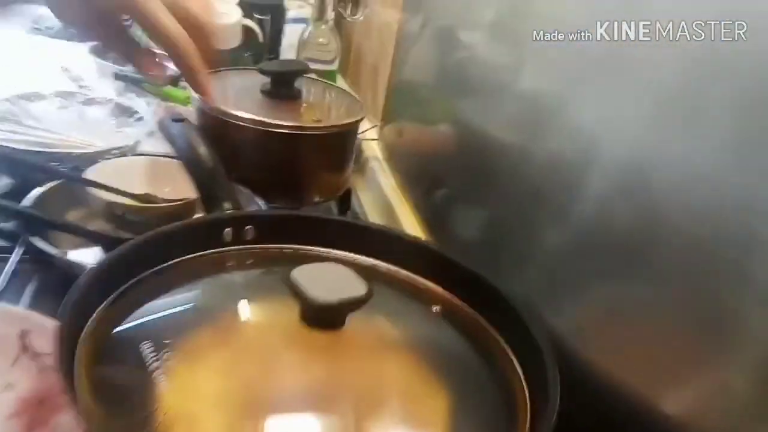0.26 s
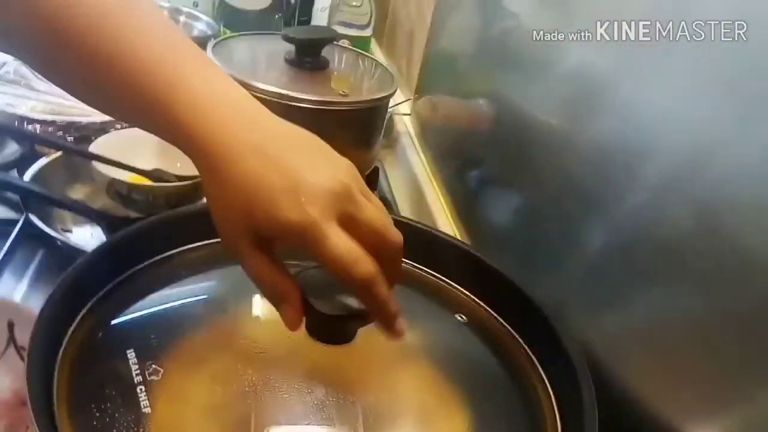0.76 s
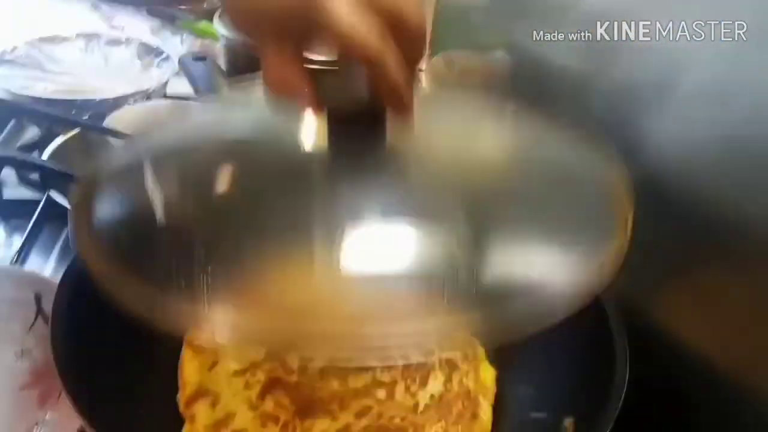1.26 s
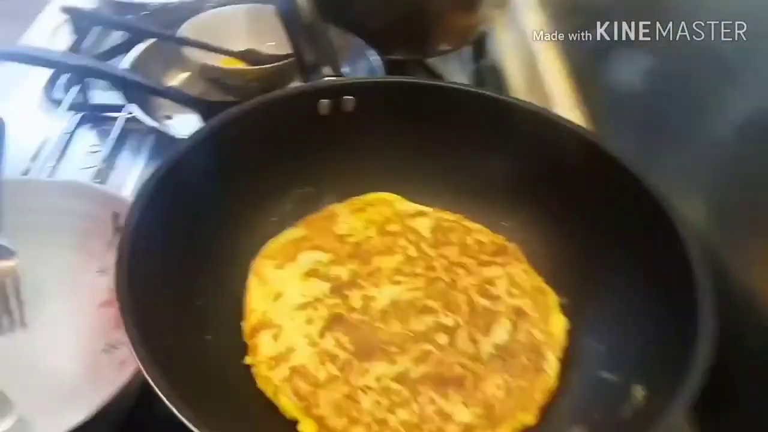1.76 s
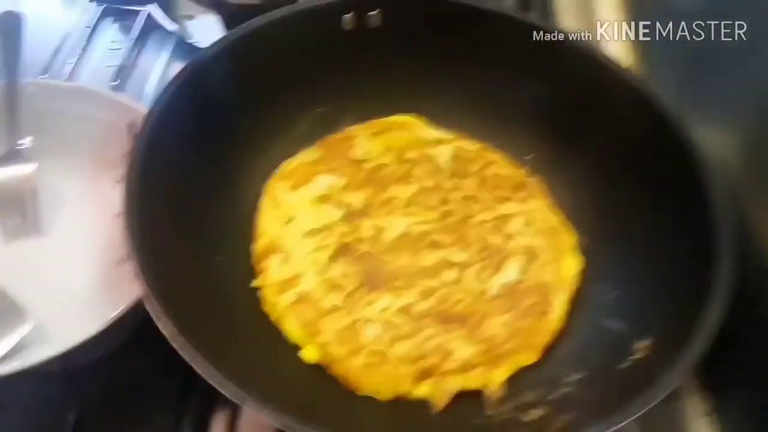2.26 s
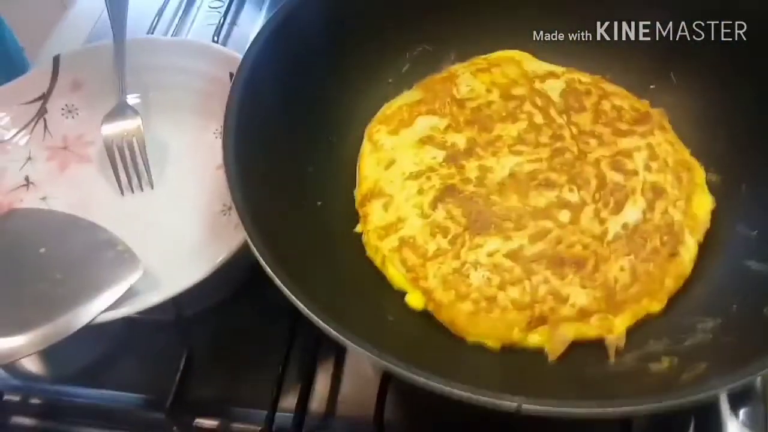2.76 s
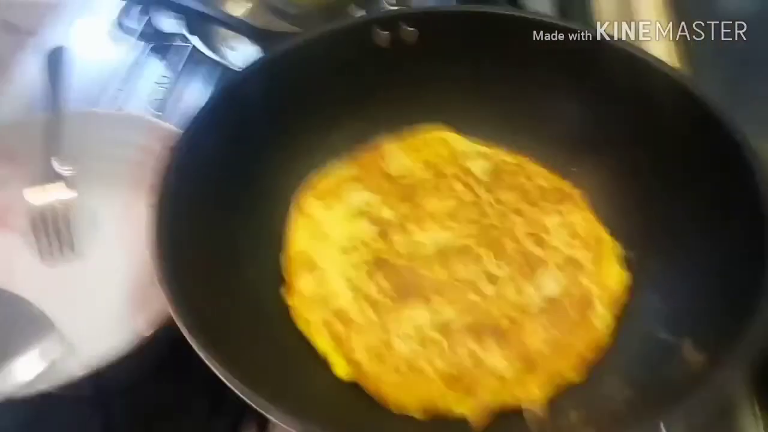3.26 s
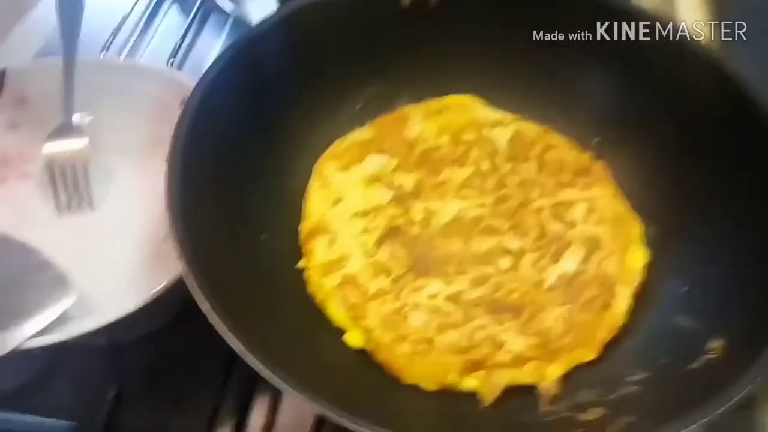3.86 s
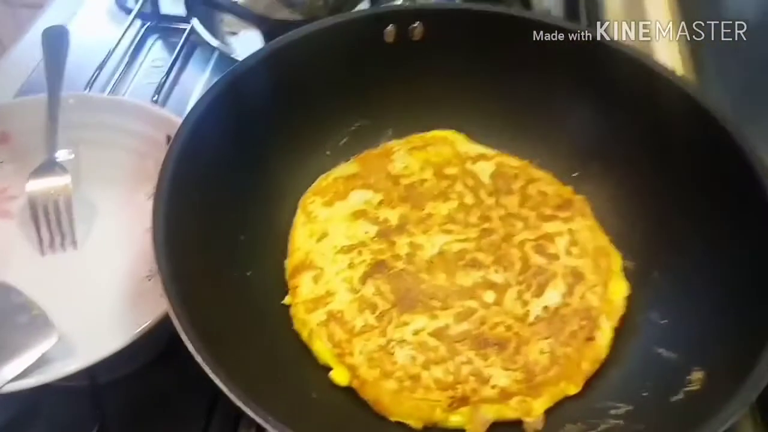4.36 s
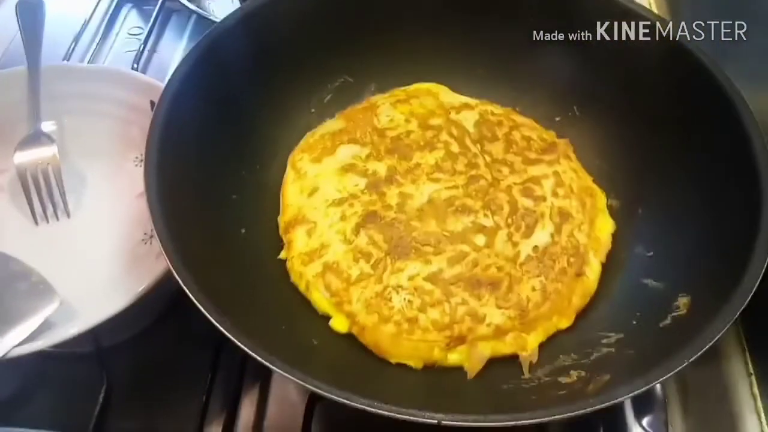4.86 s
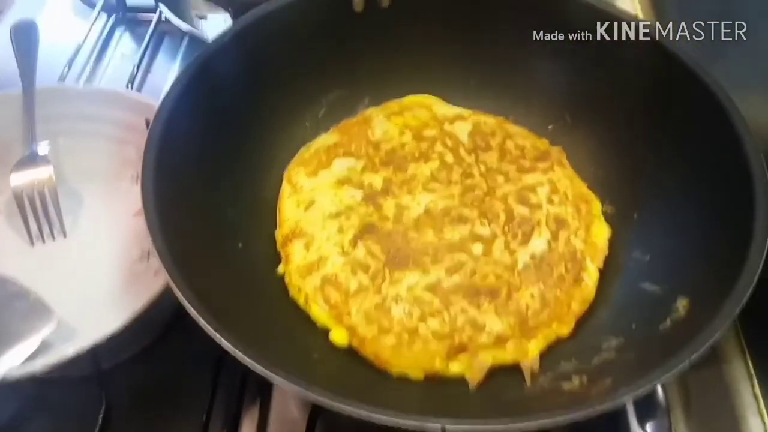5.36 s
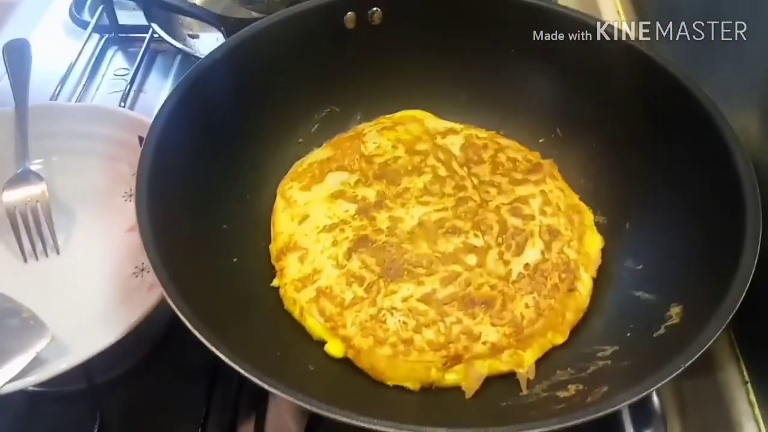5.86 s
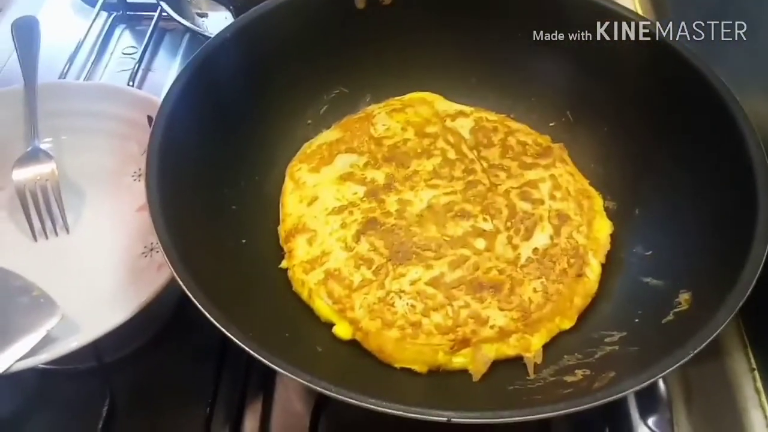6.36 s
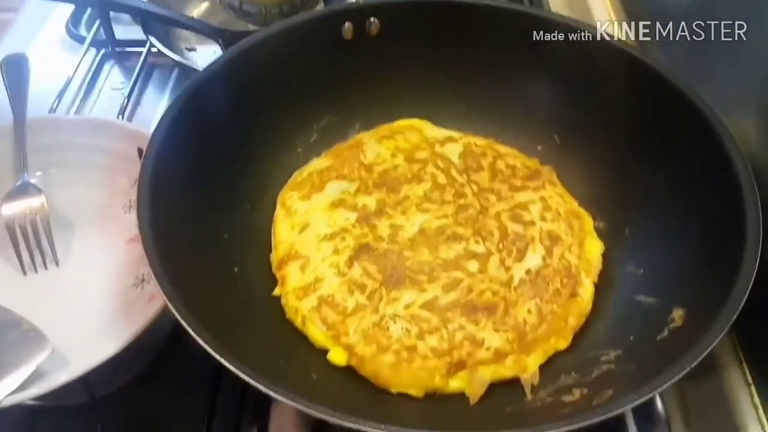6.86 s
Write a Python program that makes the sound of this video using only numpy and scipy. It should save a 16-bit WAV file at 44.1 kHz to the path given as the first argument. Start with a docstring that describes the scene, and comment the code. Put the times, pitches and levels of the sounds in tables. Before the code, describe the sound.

A running cooker hood fills a small home kitchen with rushing air, a fluttering low boom and a thin motor hum. Fingers tick and brush on the handheld stereo device, mostly to the right. At about one second a glass lid clunks, rattles and scrapes briefly off the pan. The muffled frying then opens into soft fizz with small bubbles and occasional sharp spits, thickening into crackles at the very end.

```python
"""Omelette under a cooker hood

A running hood roars like rushing air (shaped noise), booms in its duct (noise through resonances)
and hums near multiples of the mains (sines). A hand lifts the glass lid, which knocks and scrapes
(ringing modes); then fat fizzes, bubbles and spits openly (tiny bursts, short rings and cracks).
Fingers tick and brush on the phone, whose two far-apart microphone ports colour the treble differently."""
import sys
import numpy as np
from scipy import signal
from scipy.fft import rfft, irfft, next_fast_len
from scipy.io import wavfile
from scipy.ndimage import uniform_filter1d, map_coordinates

SR = 44100
rng = np.random.default_rng(int(sys.argv[2]) if len(sys.argv) > 2 else 0)


def put_to_file(sound):
    """Save the sound as 16-bit audio at rate SR, in the file named by the first command-line argument."""
    columns = np.atleast_2d(sound).T  # one column per channel
    safe = np.clip(columns, -1, 1)
    whole_steps = np.round(safe * 32767)
    wavfile.write(sys.argv[1], SR, whole_steps.astype(np.int16))


N = 313683  # length [samples]

# Levels in the tables are those of each source, before the room and the ports colour them.
# Rushing air of the hood:
# (frequency [Hz], left level per Hz [dB], right level per Hz [dB], likeness of the two sides [0-1])
AIR_SPECTRUM = [(30, -66, -69, 0.8), (53.4, -70, -73, 0.95), (67.4, -64, -64, 1), (109, -58, -61.5, 0.96),
                (180, -67, -66.5, 1), (270, -74.5, -77.5, 0.57), (314, -72.5, -83.5, 1),
                (585, -79, -81, 0.93), (650, -78, -73.5, 0.19), (1010, -84.5, -82.5, 0.53),
                (1370, -83, -84, 0.56), (2450, -90.5, -89.5, 0.12), (4330, -100, -104.5, 0),
                (8900, -112, -112, 0.3)]
# Weaker air resonances of the duct: (frequency [Hz], width [Hz], left level [dB], right level [dB])
DUCT_RESONANCES = [(213.8, 30, -48, -49.5), (397, 73, -53, -60), (628.3, 51, -59.5, -63.5),
                   (837, 154, -63.5, -52)]
# Louder throbs of the strongest duct resonance: (time [s], peak level [dB], half length [s])
BOOM_THROBS = [(.04, -37.5, 0.028), (.12, -31, 0.024), (.31, -41, 0.011), (.42, -33, 0.012),
               (.5, -38, 0.016), (.6, -33.5, 0.013), (.72, -27, 0.028), (.85, -31.5, 0.027),
               (.95, -36, 0.024), (1.04, -29, 0.037), (1.2, -35, 0.057), (1.31, -30.5, 0.049),
               (1.56, -36, 0.051), (1.75, -35, 0.026), (1.85, -38, 0.033), (1.995, -36, 0.041),
               (2.087, -34, .02), (2.18, -36.5, 0.018), (2.28, -39.5, 0.029), (2.395, -37.5, 0.016),
               (2.56, -38, 0.02), (2.77, -41, 0.02), (2.91, -38, 0.039), (3.04, -29, 0.044),
               (3.21, -37, 0.056), (3.42, -30, 0.025), (3.66, -38, 0.011), (3.8, -34, 0.011),
               (3.89, -34, .018), (3.97, -32, 0.035), (4.32, -39.5, 0.027), (4.38, -38.5, .02),
               (4.51, -36.5, .025), (4.61, -37, .025), (4.72, -43, 0.018), (4.79, -31.5, 0.017),
               (4.9, -29.5, 0.027), (5.02, -32, 0.024), (5.15, -31.5, 0.03), (5.28, -27.5, 0.026),
               (5.41, -31, 0.04), (5.51, -32, 0.033), (5.61, -32, 0.022), (5.81, -40, 0.016),
               (5.96, -33, 0.026), (6.18, -33.5, 0.017), (6.253, -34.5, 0.017), (6.43, -32.5, 0.029),
               (6.52, -28, 0.041), (6.6, -35, .02), (6.72, -33.5, 0.031), (6.814, -30, 0.022),
               (6.9, -42, .02), (6.98, -38, 0.017), (7.05, -33, 0.024)]
# Steady motor hum:
# (frequency [Hz], left level [dB], right level [dB], left leads by [rad], level waver [dB])
STEADY_HUM = [(900, -63, -70, 0.84, 1.5)]
# Strongest hum line as the phone moves: (time [s], level midway between the sides [dB])
WHINE_LEVEL = [(0.0, -61), (0.12, -50), (0.16, -73), (0.3, -61), (0.44, -60), (0.71, -55.5), (0.81, -62),
               (0.87, -54), (1.11, -60.5), (1.94, -52), (1.98, -65), (2.08, -49.5), (2.18, -67),
               (2.33, -47.5), (3.11, -52.5), (3.17, -47.5), (3.4, -53.5), (3.56, -46), (3.64, -63),
               (3.7, -49), (3.96, -53), (4.49, -50.5), (4.55, -55), (5.68, -49.5), (6.04, -52),
               (6.12, -47.5), (6.44, -55.5), (6.99, -50.5), (7.01, -56), (7.11, -51.5)]
# Lower hum line as the phone moves: (time [s], level midway between the sides [dB])
LOW_HUM_LEVEL = [(0.0, -46), (0.67, -58), (1.21, -48), (1.33, -60), (1.42, -52.5), (2.43, -49.5),
                 (2.83, -56.5), (2.91, -45), (3.05, -60), (3.17, -48), (3.86, -57), (3.96, -73),
                 (4.0, -48.5), (4.39, -57), (5.7, -52), (6.28, -55), (6.99, -48), (7.11, -59)]
# Fingers ticking on the phone case:
# (time [s], left peak [dB], right peak [dB], centre [Hz], 60 dB decay [s], dull body [dB])
FINGER_TICKS = [(.049, -55, -41, 5000, .006, -6), (0.058, -55, -39, 9400, 0.0057, -6),
                (.353, -55, -44, 6400, .03, -12), (0.362, -55, -32, 10500, .012, -6),
                (0.379, -55, -35, 6200, 0.0083, -10), (0.3853, -40, -20.5, 6300, 0.0056, -2.5),
                (.404, -49, -42, 6500, .008, -12), (3.1945, -41, -30, 1110, 0.021, -5),
                (3.2052, -52, -38, 2380, 0.015, -6), (3.215, -54, -41, 2000, 0.017, -7),
                (3.769, -54, -18, 4660, 0.0036, 0.5), (3.965, -47, -40, 2500, .008, -8)]
# Skin brushing past the right port: (time [s], level [dB], half length [s])
SKIN_BRUSHES = [(0.39, -45, 0.035), (0.46, -51, 0.055), (0.545, -46, 0.05), (0.721, -49, 0.012)]
# Fat hitting the closed lid from inside: (time [s], level [dB])
LID_DROPS = [(0.1361, -90), (0.192, -86), (0.7143, -86)]
# Lid touching the rim:
# (time [s], level [dB], contact time [s], hard tick against thump [dB], modes favoured around [Hz])
LID_KNOCKS = [(0.9823, -37.5, 0.0006, -2.5, 5670), (0.9827, -22, 0.0025, -30, 215),
              (0.9978, -33.5, 0.00083, -7, 1850), (0.9993, -26.5, 0.0013, -25, 326),
              (1.012, -31, 0.001, -11, 1850), (1.0056, -41.5, .001, -2.5, 2690),
              (1.023, -32.5, 0.00089, -10.5, 1850), (1.027, -43, .001, -3, 4140),
              (1.036, -40, 0.0022, -7, 7280), (1.045, -43, .002, -1, 6500),
              (1.068, -40, 0.00081, -8.5, 7930), (1.076, -47, 0.0017, -7, 2900),
              (1.082, -43, .002, 0, 4900), (1.117, -40, 0.00085, -24, 740)]
# Ringing modes of the glass lid:
# (frequency [Hz], level [dB], 60 dB decay [s], left minus right [dB])
LID_MODES = [(220, 1.5, 0.031, -1), (265, 2, 0.039, 1), (326, -5, 0.13, 7), (383, -6, 0.085, 0),
             (440, -12, 0.056, -4), (596, -8, 0.045, -11), (740, -8, 0.05, -4), (955, -4, 0.037, 2),
             (1310, -7, 0.033, 2), (1844, 2, 0.042, -14), (1884, -3, 0.037, -1), (2290, -9, .04, 0),
             (2690, 1, 0.062, -1), (3080, -3, 0.069, -3), (3550, -6, .045, 2), (4140, -10, 0.059, 6),
             (4870, -7, 0.062, -7), (5450, -12, 0.045, -3), (5710, -9, 0.11, -11), (6200, -13, 0.05, -6),
             (6630, -10, 0.041, -8), (7280, -14, 0.06, -11), (7930, -16, .035, -12)]
# Frying fizz at each port, muffled on the left until the lid is off:
# (time [s], right level [dB], left level [dB], treble boost on the right [dB])
FIZZ_LEVELS = [(0.0, -59, -72, -4.5), (0.4, -53, -71, -8), (0.95, -53, -73, -11), (1.15, -52.5, -60, -4),
               (1.45, -50.5, -57, 1), (2.2, -55, -57.5, 5), (4.0, -53.5, -56, 3.5), (5.7, -55, -58.5, -1),
               (6.84, -56, -58.5, -1.5), (6.9, -52.5, -54, -1), (7.0, -48, -47.5, 1), (7.11, -46, -52, -9)]
# Fat spitting: (time [s], right level [dB], left level [dB], lowest frequency of the crack [Hz])
FAT_SPITS = [(1.021, -20, -25, 6600), (1.3239, -28, -29, 4750), (1.427, -28, -32.5, 4750),
             (1.45, -25, -27, 4550), (1.656, -12.5, -12.5, 5900), (2.4743, -27, -42, 4800),
             (3.506, -13, -12.5, 5830), (3.7259, -30, -33, 4750), (3.8294, -30, -30, 4750),
             (3.8704, -23, -39, 5500), (3.956, -29, -18.5, 2200), (4.1417, -30, -30.5, 5150),
             (6.277, -30, -32, 2650), (6.5, -29.5, -34, 3000), (6.9077, -31, -32.5, 4750),
             (6.93, -35, -31, 4750), (6.978, -34, -26, 4750), (6.99, -31, -31, 4750),
             (7.008, -33, -31, 4750), (7.0322, -26, -23, 4770), (7.045, -30, -32, 4500),
             (7.072, -32, -33, 4500), (7.1006, -27, -26, 2900)]
# Pan wall ringing when fat cracks: (frequency [Hz], width [Hz], level against the crack [dB])
PAN_WALL = [(5000, 130, 0), (6280, 130, -6), (7500, 140, 2.5)]
# Colour of the ports, counted from the first row: (frequency [Hz], left gain [dB], right gain [dB])
PORT_COLOUR = [(990, -3, -4), (3040, -1.5, -1.5), (5860, -2.5, -1.5), (5880, -3.5, 1.5), (7370, -6.5, -2.5),
               (8050, -24, -7), (8500, -20, -10), (9000, -12, -10), (10300, -10, -12.5), (11600, -7.5, -18),
               (13100, -4.5, -16), (14000, 2, -22), (15900, -1, -26)]
# Hiss of the microphones themselves: (left level [dB], right level [dB])
MICROPHONE_HISS = [-71, -82]

AIR_LAG_S = 0.00021  # the hood is nearer to the left port
# the bass of the roar comes in lumps
SURGE_DB, SURGE_TOP_HZ, SURGES_PER_S = 2.5, 201, 12
SURGE_WITH_BOOM = 0.25  # share of the boom's swing in dB that the bass follows
BOOM_HZ, BOOM_WIDTH_HZ, BOOM_PAN_DB = 146.3, 13.5, 2
BOOM_DB, BOOM_FLUTTER_DB = -49.5, 1.5  # level between the throbs; unsteadiness
THROB_EDGE_DB = 8.5  # drop in level half a length from the peak
# a wider duct resonance, mostly on the left
DRONE_HZ, DRONE_WIDTH_HZ, DRONE_PAN_DB = 321.3, 49.5, 9.5
DRONE_DB, DRONE_SWELL_DB, DRONE_SWELLS_PER_S = -55.5, 4.5, 8
# hum lines: pan is left minus right, lead is how far the left is ahead
WHINE_HZ, WHINE_PAN_DB, WHINE_LEAD_RAD, WHINE_WAVER_DB = 799.8, 11.5, 0.72, 2
LOW_HUM_HZ, LOW_HUM_PAN_DB, LOW_HUM_LEAD_RAD, LOW_HUM_WAVER_DB = 401, 6, 0.69, 3
# standing waves: depth, spacing, how fast the moving hand changes them
ROOM_RIPPLE_DB, ROOM_CELL_HZ, ROOM_DRIFT_S = 3.8, 70, 0.1
BRUSH_EDGE_DB = 9  # drop in level half a length from the middle
# lid sliding off: it catches, weakens, drags the rim once more and lifts clear
SCRAPE_S, SCRAPE_DB, SCRAPE_FADE_DB_PER_S = 0.982, -40.5, 150
DRAG_S, DRAG_DB, DRAG_HALF_S = 1.074, 11, 0.017
LIFT_S, LIFT_DB_PER_S = 1.095, 250
RATTLES_PER_S = 700  # tiny contacts of the sliding lid
KNOCK_COLOUR_DB = 2.5  # each contact falls on another spot and favours other modes
KNOCK_DETUNE = 0.004  # the grip and the tilt shift the modes by about this share
FAVOUR_DB, FAVOUR_OCTAVES = 6, 0.099
BUBBLES_PER_S, BUBBLE_DB, BUBBLE_SPREAD_DB = 260, -61, 2.5
BUBBLE_LOW_HZ, BUBBLE_OCTAVES, BUBBLE_CYCLES = 993, 1.783, 12.6
SPIT_SHARPNESS = 0.57  # 0 hiss, 1 crack
SPIT_T60_S, SPIT_T60_S_PER_GAIN = 0.04, 0.1  # a bigger drop leaves a longer tail
BASS_CUT_HZ, TOP_HZ = 101.4, 15450


def undb(db):
    """Turns a level in dB into a gain."""
    return 10 ** (np.asarray(db) / 20)


def unit(x):
    """Scales a sound to an average strength (rms) of 1."""
    return x / np.sqrt(np.mean(x ** 2, axis=-1, keepdims=True))


def spread(pan_db):
    """Shares a left-minus-right difference between the sides."""
    return pan_db * np.array([[0.5], [-0.5]])


def curves(table):
    """Draws every column after the time as a line, sample by sample."""
    s, *columns = np.transpose(table)
    return [np.interp(np.arange(N) / SR, s, c) for c in columns]


def band(x, hz, width_hz):
    """Lets through one resonance."""
    return signal.lfilter(*signal.iirpeak(hz, hz / width_hz, fs=SR), x)


def high(x, hz):
    """Lets through what lies above a frequency."""
    return signal.sosfilt(signal.butter(2, min(hz, 0.4 * SR), "high", fs=SR, output="sos"), x)


def walk(rate):
    """Wanders at random: levels held 1 / rate seconds, smoothed twice, rms 1."""
    k = int(SR / rate)
    steps = np.repeat(rng.standard_normal(N // k + 1), k)
    smooth = uniform_filter1d(uniform_filter1d(steps, k), k)
    return unit(smooth[:N])


def add(out, s, x):
    """Mixes x into out from time s."""
    i = int(s * SR)
    out[..., i:i + x.shape[-1]] += x[..., :N - i]


def bumps(table, edge_db, power):
    """Adds up rounded swells given as (time [s], level [dB], half length [s])."""
    t = np.arange(N) / SR
    return sum(undb(db - edge_db * (np.abs(t - s) / half) ** power) for s, db, half in table)


def throb():
    """Gain of the duct boom over time: a steady floor plus the throbs."""
    return bumps(BOOM_THROBS, THROB_EDGE_DB, 1.56) + undb(BOOM_DB)


def air():
    """Broad roar of noise, alike on both sides in the bass, plus the weaker duct resonances."""
    size = next_fast_len(N)
    hz = np.arange(size // 2 + 1) * SR / size
    at, *columns = np.transpose(AIR_SPECTRUM)
    left_db, right_db, like = (np.interp(np.log(hz + 1), np.log(at), c) for c in columns)
    like = np.clip(like, 0, 1)
    left, other = rfft(rng.standard_normal((2, size)))
    late = left * np.exp(-2j * np.pi * hz * AIR_LAG_S)
    right = like * late + np.sqrt(1 - like ** 2) * other
    shaped = np.array([left * undb(left_db), right * undb(right_db)])
    out = irfft(shaped, size)[:, :N] * np.sqrt(SR / 2)
    for f, width, *db in DUCT_RESONANCES:
        ring = band(band(rng.standard_normal(N), f, width), f, width)
        out = out + undb(db)[:, None] * unit(ring)
    bass = signal.sosfiltfilt(signal.butter(2, SURGE_TOP_HZ, fs=SR, output="sos"), out)
    surge = unit(throb() ** SURGE_WITH_BOOM) * undb(SURGE_DB * walk(SURGES_PER_S))
    out = out + bass * (surge - 1)
    return out * undb(0.84 * walk(16))


def boom():
    """Noise ringing in the duct: the pitch wanders freely, the level flutters and throbs."""
    noise = rng.standard_normal(N)
    ring = band(band(noise, BOOM_HZ, BOOM_WIDTH_HZ), BOOM_HZ, BOOM_WIDTH_HZ)
    ring = signal.hilbert(ring, next_fast_len(N))[:N]
    # dividing by its own outline evens out most of the noise's swing
    even = ring.real / (np.abs(ring) + 0.37 * ring.real.std())
    level = throb() * undb(BOOM_FLUTTER_DB * walk(17))
    return unit(even) * level * undb(spread(BOOM_PAN_DB))


def drone():
    """Noise in a broad duct resonance that swells and sinks."""
    noise = rng.standard_normal(N)
    ring = band(band(noise, DRONE_HZ, DRONE_WIDTH_HZ), DRONE_HZ, DRONE_WIDTH_HZ)
    swell_db = DRONE_SWELL_DB * walk(DRONE_SWELLS_PER_S)
    return unit(ring) * undb(DRONE_DB + swell_db + spread(DRONE_PAN_DB))


def motor():
    """Sines near mains multiples, slightly unsteady in level and phase."""
    t, out = np.arange(N) / SR, 0
    lines = list(STEADY_HUM)
    for f, table, pan_db, lead, waver_db in [
            (WHINE_HZ, WHINE_LEVEL, WHINE_PAN_DB, WHINE_LEAD_RAD, WHINE_WAVER_DB),
            (LOW_HUM_HZ, LOW_HUM_LEVEL, LOW_HUM_PAN_DB, LOW_HUM_LEAD_RAD, LOW_HUM_WAVER_DB)]:
        level_db = curves(table)[0]
        lines.append((f, level_db + pan_db / 2, level_db - pan_db / 2, lead, waver_db))
    for f, left_db, right_db, lead, waver_db in lines:
        phase = 2 * np.pi * f * t + 0.78 * walk(4.164)
        left = undb(left_db) * np.sin(phase + lead)
        right = undb(right_db) * np.sin(phase)
        out = out + np.sqrt(2) * undb(waver_db * walk(18)) * np.array([left, right])
    return out


def room(x):
    """Standing waves lift and sink narrow bands, differently at each port, and drift as the phone moves."""
    hz, s, z = signal.stft(x, SR, nperseg=2048)
    field = rng.standard_normal((2, 800, 80))
    grid = np.meshgrid([0, 1], hz / ROOM_CELL_HZ, s / ROOM_DRIFT_S, indexing="ij")
    # long waves meet both ports alike and are left more even
    depth_db = ROOM_RIPPLE_DB * np.clip(hz / 500, 0, 1)[:, None]
    ripple = undb(depth_db * map_coordinates(field, grid, order=1))
    return signal.istft(z * ripple, SR, nperseg=2048)[1][:, :N]


def hand():
    """Short dry ticks from noisy snaps and a soft brushing of noise, mostly at the right port."""
    out, t = np.zeros((2, N)), np.arange(2000) / SR
    for s, left_db, right_db, hz, t60, body_db in FINGER_TICKS:
        snap = 2.1 * np.eye(1, 2000)[0] + 0.5 * rng.standard_normal(2000)
        snap = snap * undb(-60 * t / t60)
        bright = band(band(snap, hz, 0.43 * hz), hz, 0.82 * hz)
        tick = bright + undb(body_db) * band(snap, 1700, 2200)
        add(out, s, tick / np.abs(tick).max() * undb([[left_db], [right_db]]))
    rub = rng.standard_normal((3, N))
    skin = 0.5 * high(rub[0], 3800) + 0.97 * band(rub[1], 6100, 2000) + 1.2 * band(rub[2], 1600, 900)
    out[1] += bumps(SKIN_BRUSHES, BRUSH_EDGE_DB, 1.8) * undb(2.5 * walk(138.4)) * skin
    return out


def scrape_db():
    """Level of the sliding lid over time: it fades, drags once more and lifts clear."""
    t = np.arange(N) / SR
    fade_db = SCRAPE_DB - SCRAPE_FADE_DB_PER_S * (t - SCRAPE_S)
    drag_db = DRAG_DB * np.exp(-((t - DRAG_S) / DRAG_HALF_S) ** 2)
    lift_db = -LIFT_DB_PER_S * np.maximum(t - LIFT_S, 0)
    silence_before_db = -10000 * np.maximum(SCRAPE_S - t, 0)
    return fade_db + drag_db + lift_db + silence_before_db


def lid():
    """Knocks, drops and a gritty scrape all ring the same glass; the scrape is also heard as a dry rasp."""
    count = len(LID_KNOCKS)
    out, push, knocks = np.zeros((2, N)), np.zeros(N), np.zeros((count, 2 * SR))
    for row, (s, db, contact, tick_db, _) in zip(knocks, LID_KNOCKS):
        # a soft thump with a hard tick at first touch
        thump = np.hanning(int(contact * SR) + 3)
        thump = thump / thump.sum()
        thump[:2] += undb(tick_db) * np.array([1, -1])
        start = int(s * SR)
        row[start:start + len(thump)] = undb(db) * thump
    for s, db in LID_DROPS:
        # a small drop pushes mostly around one high frequency
        drop = rng.standard_normal(400) * np.exp(-np.arange(400) / 90)
        add(push, s, undb(db) * unit(band(drop, 6100, 1600)))
    grit = undb(scrape_db() + 1.8 * walk(150)) * rng.standard_normal((3, N))
    rattle = grit[0] * (rng.random(N) < RATTLES_PER_S / SR)
    push = push + 0.09 * high(high(rattle, 2500), 2500)
    favoured_hz = np.transpose(LID_KNOCKS)[4]
    for f, db, t60, pan_db in LID_MODES:
        pole = np.exp(2j * np.pi * f / SR - np.log(1000) / (t60 * SR))
        # the higher the mode, the more the spot of contact matters
        spot_db = KNOCK_COLOUR_DB * min(f / 2000, 1) * rng.standard_normal(count)
        favour_db = FAVOUR_DB * np.exp(-(np.log2(f / favoured_hz) / FAVOUR_OCTAVES) ** 2)
        ring = signal.lfilter([1], [1, -pole], push[:2 * SR])
        for gain, knock, shift in zip(undb(spot_db + favour_db), knocks, rng.standard_normal(count)):
            shifted = pole * np.exp(2j * np.pi * f * KNOCK_DETUNE * shift / SR)
            # no knock comes in the first half second
            ring[SR // 2:] += signal.lfilter([gain], [1, -shifted], knock[SR // 2:])
        # each port hears a mode with its own phase, the more so the shorter the wave
        turn = np.exp(1j * min(f / 600, np.pi) * rng.standard_normal())
        sides = np.array([ring.imag, (ring * turn).imag])
        out[:, :2 * SR] += undb(db + spread(pan_db)) * sides
    return out + 1.3 * band(grit[1:], 2000, 6000) + 0.11 * grit[1:]


def bubbles():
    """Larger steam bubbles in the egg each ring a few cycles, somewhere between the two ports."""
    out, t = np.zeros((2, N)), np.arange(800) / SR
    for when, pitch, size, side in rng.random((int(BUBBLES_PER_S * N / SR), 4)):
        hz = BUBBLE_LOW_HZ * 2 ** (BUBBLE_OCTAVES * pitch)
        turns = hz * t / BUBBLE_CYCLES
        # the pitch rises slightly as the ring fades
        phase = 2 * np.pi * hz * t * (1 + 0.032 * turns) + np.array([[0], [9 * side]])
        ring = turns * np.exp(-4 * turns) * np.sin(phase)
        db = -BUBBLE_SPREAD_DB * np.log(1 - 0.95 * size) - 2.1 * np.log2(hz / 1000)
        add(out, when * N / SR, ring * undb(db) * np.array([[side], [1 - side]]))
    return unit(out) * undb(BUBBLE_DB)


def fizz():
    """Thousands of tiny steam bubbles burst, a few much louder, smeared by the pan into a hiss."""
    right_db, left_db, bright_db = curves(FIZZ_LEVELS)
    loudness = undb(1.64 * np.minimum(rng.exponential(size=N), 7.5))
    bursts = (rng.random(N) < 2500 / SR) * loudness * rng.choice([-1, 1], N)
    t = np.arange(600) / SR
    smear = rfft(rng.standard_normal((2, 600)) * np.exp(-t / 0.001))
    # the smear spreads a burst in time with little colouring
    smear = irfft(smear / uniform_filter1d(np.abs(smear), size=5, axis=1))
    smeared = unit(signal.fftconvolve(bursts[None], smear, axes=1)[:, :N])
    heard = smeared + 0.71 * rng.standard_normal((2, N))
    left, right = unit(high(heard, 1750)) * undb(1.2 * np.array([walk(11), walk(11)]))
    right = right + (undb(bright_db) - 1) * high(right, 4400)
    return np.array([left * undb(left_db), right * undb(right_db)])


def spits():
    """A crack, an echo from the pan wall a millisecond later, scattered later echoes and a short hiss."""
    out, t = np.zeros((2, N)), np.arange(4000) / SR
    for s, right_db, left_db, low_hz in FAT_SPITS:
        t60 = SPIT_T60_S + SPIT_T60_S_PER_GAIN * undb(max(left_db, right_db))
        echoes = (rng.random((2, 4000)) < 700 / SR) * rng.standard_normal((2, 4000))
        # crack and wall echo: the echo is the stronger on the left, the weaker on the right
        echoes[:, [0, 44]] = [[1.1, 1.3], [1.9, 0.5]]
        hiss = rng.standard_normal((2, 4000)) * (0.3 - 0.24 * SPIT_SHARPNESS)
        burst = (SPIT_SHARPNESS * echoes + hiss) * undb(-60 * t / t60)
        add(out, s, high(high(burst, low_hz), low_hz) * undb([[left_db], [right_db]]))
    return out


def pan(x):
    """The crack itself and the ring that it leaves in the metal."""
    return x + sum(undb(db) * band(x, hz, width) for hz, width, db in PAN_WALL)


def scene():
    """Hood, hand on the phone, lid and frying pan together."""
    hood = boom() + drone() + motor()
    frying = bubbles() + pan(spits())
    return room(air() + fizz()) + hood + hand() + lid() + frying


def record(dry):
    """Each port colours the sound without ringing ahead of it; own hiss is added and both ends are cut."""
    hz = np.arange(257) * SR / 512
    at, *db = np.transpose(PORT_COLOUR)
    gain_db = np.array([np.interp(np.log(hz + 1), np.log(at), c - c[0]) for c in db])
    log_gain = gain_db * np.log(10) / 20
    # folding the log gain's transform onto positive times makes the response causal
    fold = np.r_[1, np.full(255, 2), 1, np.zeros(255)]
    taps = irfft(np.exp(rfft(irfft(log_gain) * fold)))
    coloured = signal.fftconvolve(dry, taps, axes=1)[:, :N]
    hiss = undb(MICROPHONE_HISS)[:, None] * rng.standard_normal((2, N))
    heard = high(coloured, BASS_CUT_HZ) + hiss
    return signal.sosfilt(signal.ellip(10, 0.2, 60, TOP_HZ, fs=SR, output="sos"), heard)


dry = scene()
out = record(dry)
put_to_file(out)
```